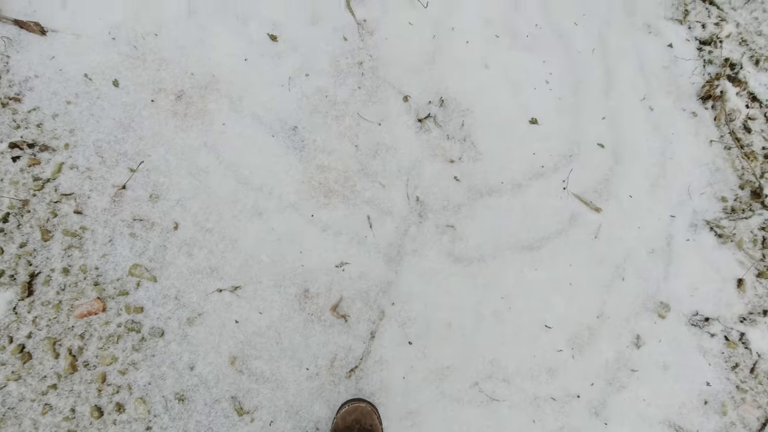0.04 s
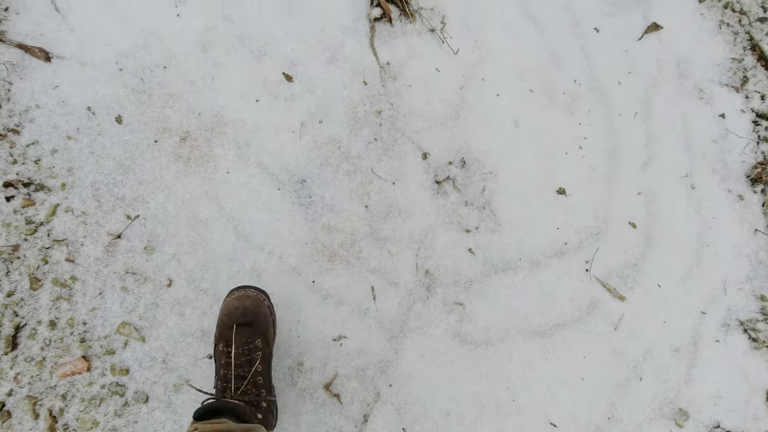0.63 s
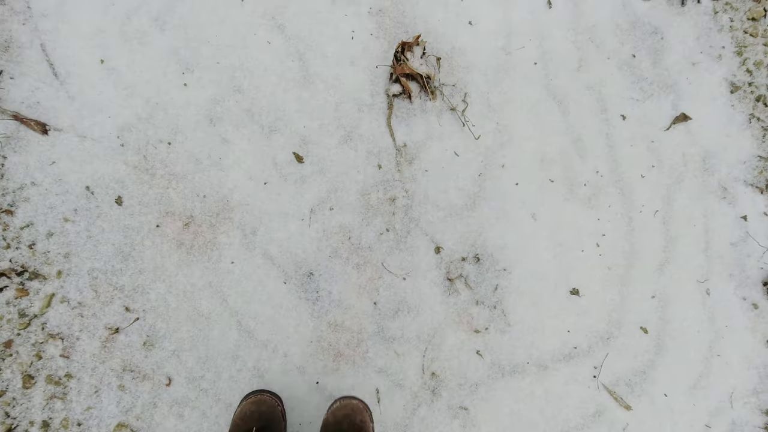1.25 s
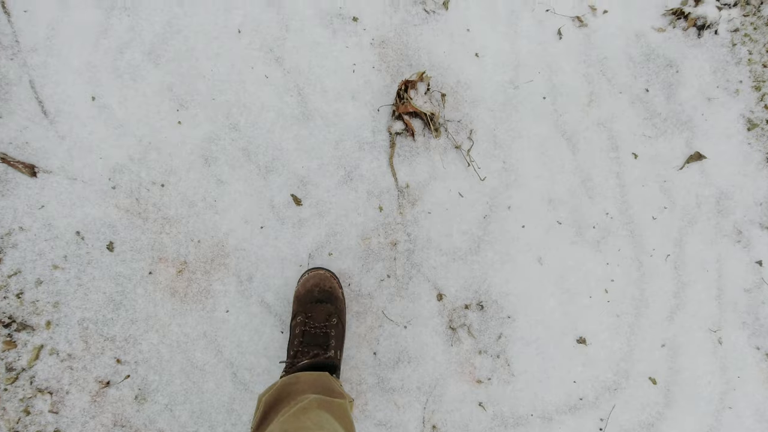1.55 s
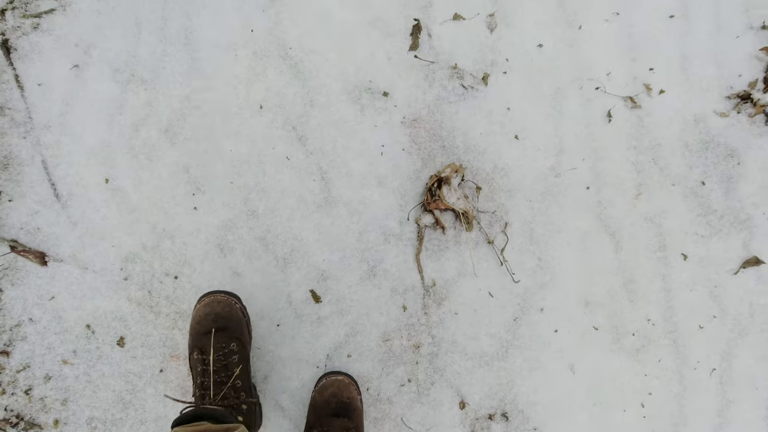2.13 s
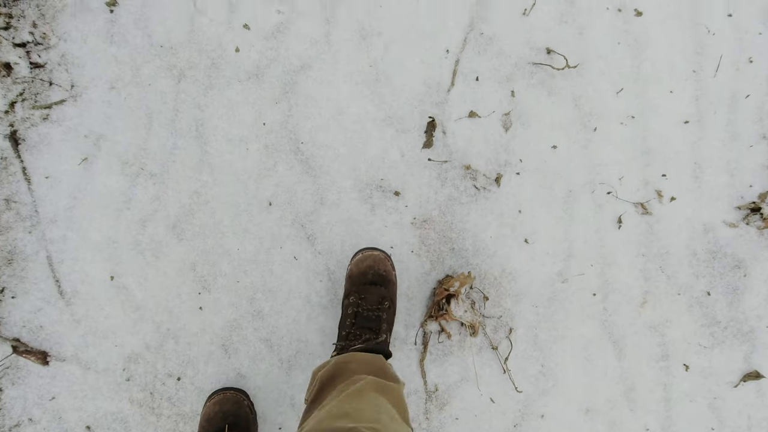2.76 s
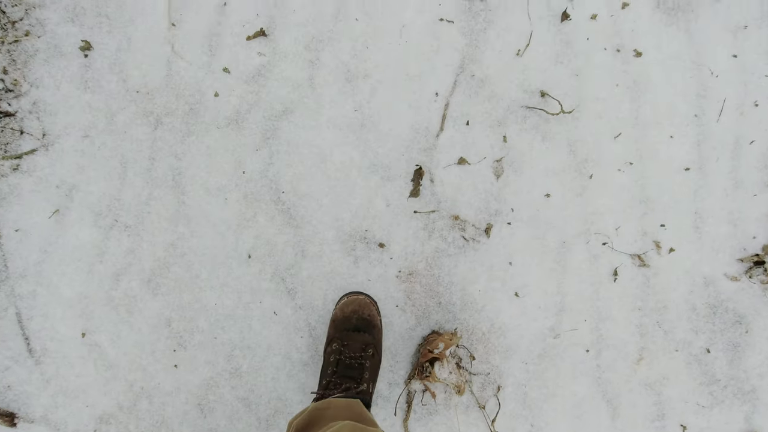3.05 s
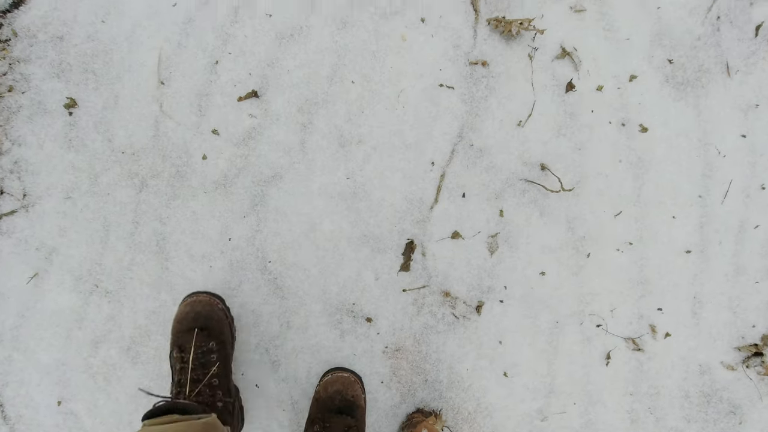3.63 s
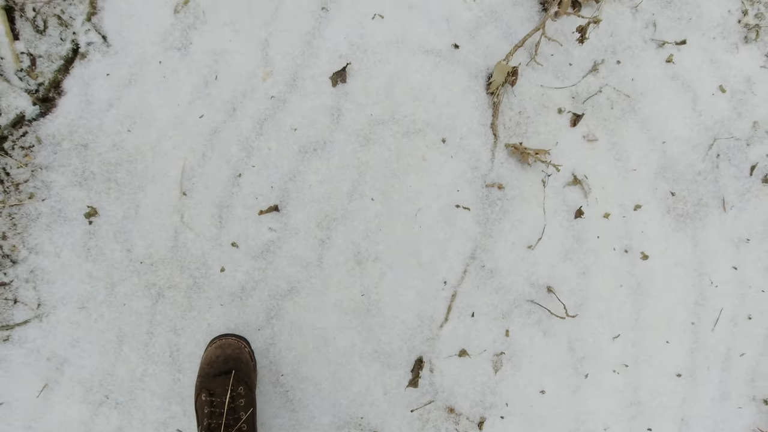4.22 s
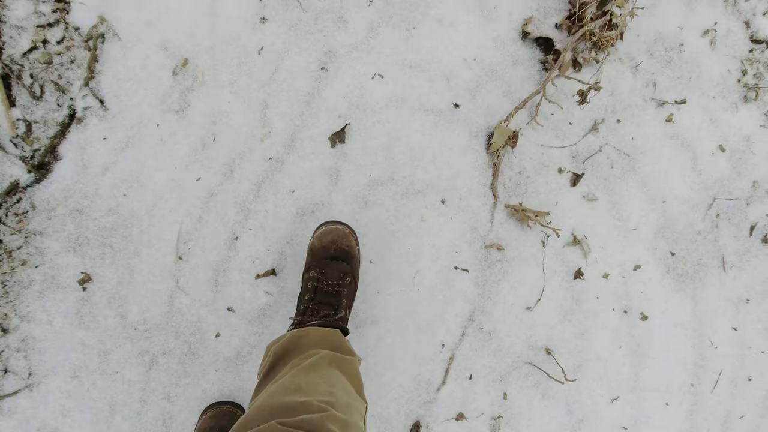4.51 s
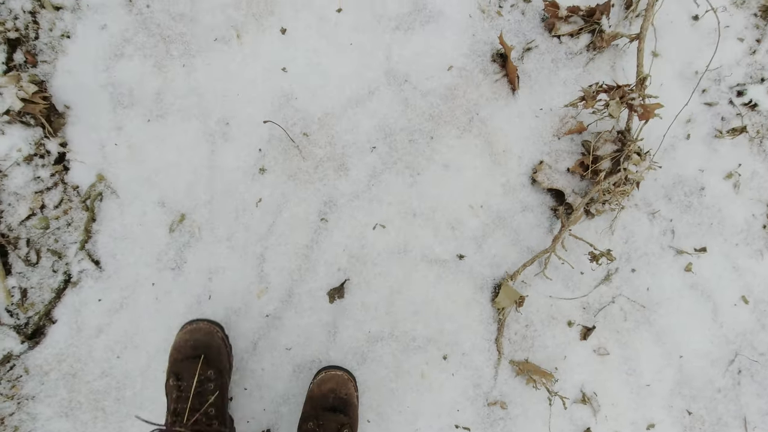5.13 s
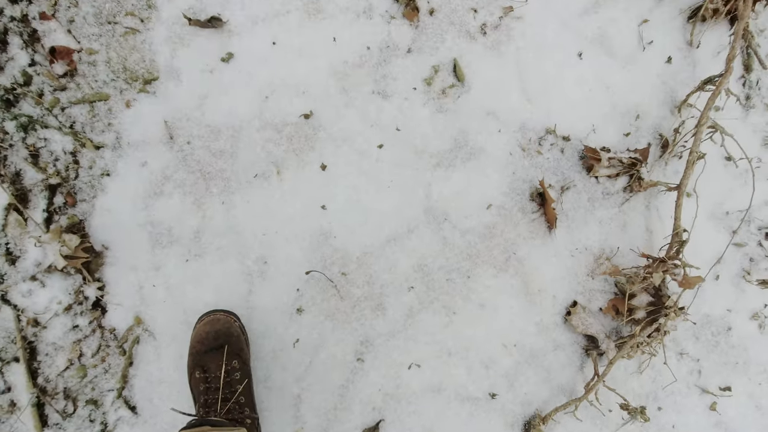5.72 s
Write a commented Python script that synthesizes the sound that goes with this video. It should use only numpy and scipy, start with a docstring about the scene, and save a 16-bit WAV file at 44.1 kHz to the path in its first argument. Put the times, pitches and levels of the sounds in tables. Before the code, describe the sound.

Leather boots walk over a thin crust of frozen snow outdoors, heard close from above. After a few light ticks, each step breaks the crust in a run of sharp cracks over a fine, gritty crackle. One sole scuffs briefly early on. Later steps sound heavier, with short thuds as the crust gives way and dull creaks of packing snow. Faint hiss, low rumble and soft puffs of air on the microphone lie beneath.

```python
"""Boots on frozen snow

Leather boots break a thin crust, heard from above. Each step snaps it in a run of sharp cracks over
a fine crackle of crumbs; a slab that gives way also thuds. Snow creaks dully as it packs, and one
sole scuffs. Faint background hiss, low rumble and slow air on the microphone lie beneath."""
import sys
import numpy as np
from scipy import signal
from scipy.fft import rfft, irfft, next_fast_len
from scipy.io import wavfile
from scipy.ndimage import uniform_filter1d

SR = 44100
rng = np.random.default_rng(int(sys.argv[2]) if len(sys.argv) > 2 else 0)


def persist_wave(psi):
    """Save psi, clipped to +-1, as 16-bit WAV."""
    counts = np.round(np.clip(psi, -1, 1) * 32767).astype(np.int16)
    wavfile.write(sys.argv[1], SR, np.atleast_2d(counts).T)


N = 263277
TIME_S = np.arange(N) / SR


def crack(db, low_hz, ring_hz, ring_db, slope_db_oct, length_ms, size=2048):
    """One fracture: a snap, a dying run of tiny slips, the short ring of the broken plate."""
    t, hz = np.arange(size) / SR, np.fft.rfftfreq(size, 1 / SR) + 1
    slip_gain, jerk_db, settle_db, settle_s, ring_oct = .29, 5, -29, .0077, .28
    burst, settling, catch = rng.standard_normal((3, size))
    jerks = undb(jerk_db * np.clip(np.repeat(catch, 16)[:size], -2, 2))  # the crack catches and jumps
    force = slip_gain * burst * jerks * np.exp(-t * 1000 / max(length_ms * 1.47, .1))
    force[0] += 1
    force += slip_gain * undb(settle_db) * settling * jerks * np.exp(-t / settle_s)
    flatten_db = -10 * np.log10(uniform_filter1d(np.abs(rfft(force)) ** 2, size=91))
    plate_db = ring_db / (1 + (np.log2(hz / ring_hz) / ring_oct) ** 2)
    plate_db += slope_db_oct * np.log2(1 + hz / 2000)
    plate_db -= 10 * np.log10(1 + (low_hz / hz) ** 5)  # small plates cannot radiate long waves
    # microphone colour on every crack, brightest near 8 kHz
    mic_colour_db = colour_db([(5000, -1), (6500, -2.5), (8300, 0), (10000, -8),
                               (12500, -9.5), (16000, -17.5)], hz)
    snap = shape(force, flatten_db + plate_db + mic_colour_db)
    rms_1ms = np.sqrt(np.sum(snap ** 2) / (SR / 1000))
    return undb(db) * snap / rms_1ms


# loud snaps: (time [s], level over 1 ms [dB], low cut [Hz], ring [Hz], slope [dB/oct], length [ms])
SNAPS = [(0.0848, -42, 2970, 7650, 0, .6), (0.1068, -45.5, 3000, 7300, 3, 0.54),
         (0.2123, -51, 2000, 5100, -3, 0.74), (0.5894, -25, 2160, 6200, 3, 0.35),
         (0.655, -42.3, 2500, 6020, 5, .3), (0.6637, -39, 4890, 8000, 6, 0.32),
         (0.7004, -44, 3050, 6040, 9, .4), (0.7585, -38, 920, 5100, 1.5, 2.5),
         (0.8841, -22.5, 940, 5000, -1, 1.1), (0.9763, -36, 2500, 3930, -12, 1.2),
         (0.9983, -30.5, 790, 4180, 3, 0.94), (1.0265, -32, 1713, 1630, -8, 3),
         (1.045, -26.5, 1370, 5350, 1.5, 0.51), (1.0609, -28.5, 1500, 1600, -0.5, 1.1),
         (1.11, -19.5, 1950, 1250, -7, 1.55), (1.1365, -19.5, 1260, 4870, -4.5, .9),
         (1.1562, -31, 1060, 3150, -7, 1.2), (1.1713, -26.5, 1760, 1850, -1, 0.92),
         (1.1773, -32, 1050, 7030, -5, 0.61), (1.1938, -29.5, 1290, 2920, -2, 0.76),
         (1.217, -23.5, 2030, 1380, -3.5, 0.71), (1.3503, -23.5, 800, 3700, -9, 1.7),
         (1.3966, -32.5, 1070, 3100, -4, 1.2), (1.4118, -28.5, 2580, 2680, -12, .7),
         (1.474, -37, 1040, 4570, 2, 1.2), (1.5009, -23, 1100, 1290, -1, 0.66),
         (1.531, -30, 1300, 1460, -2, 0.36), (1.5368, -22.5, 1410, 3770, -7, 0.4),
         (1.5472, -23.5, 1340, 1300, -8.5, 0.62), (1.6336, -34.5, 880, 2020, 4.5, .9),
         (1.6895, -25, 625, 1300, -11.5, 0.38), (1.7968, -44.5, 4460, 1490, -16, 0.7),
         (1.8424, -37, 960, 4630, -13, 1.1), (1.846, -24, 2850, 5000, -9.5, 0.8),
         (1.9349, -26, 2980, 2500, 0, 0.23), (1.9453, -34, 2500, 1120, 2, 0.3),
         (1.9663, -25.5, 4040, 1080, -11, .35), (2.154, -28.5, 1200, 5200, 5.5, .36),
         (2.1962, -25.6, 1170, 4530, -1.5, 0.78), (2.2265, -30.5, 5570, 10200, -8, 0.28),
         (2.24, -25, 1370, 2500, -2.5, 1.4), (2.3029, -25, 3100, 6800, -11.5, 0.45),
         (2.3586, -31.5, 1810, 2580, -0.5, 0.54), (2.5938, -34, 454, 795, -22.5, 0.91),
         (2.6315, -31.5, 670, 5540, -5, 0.95), (2.6817, -43, 665, 4770, 3, 1),
         (3.0849, -30.5, 895, 1360, -11.5, 1.7), (3.0966, -25, 1160, 5340, -8, 0.83),
         (3.1021, -24.5, 1250, 1320, -3, 0.5), (3.1103, -35.5, 1280, 5980, -9, .6),
         (3.1236, -36.5, 1390, 1760, -3, .6), (3.1597, -34.5, 1580, 1770, -2, .5),
         (3.1865, -32.5, 1930, 1960, -3, 3.3), (3.2703, -32, 1400, 3660, -9.5, 1),
         (3.371, -41.5, 600, 4560, -.5, 1.1), (3.4018, -44, 970, 4040, 2, 0.32),
         (3.4956, -23, 1620, 3600, -5, 0.84), (3.5852, -38, 700, 3500, 2.5, .8),
         (3.6623, -21, 460, 4050, -2.5, 0.43), (3.6686, -36, 370, 600, -5, 1.1),
         (3.6791, -29, 370, 560, 2, 0.62), (3.694, -36.5, 366, 590, -5, 1.7),
         (3.8917, -37, 3160, 3260, 4.5, 0.83), (3.982, -40, 720, 1640, -22, 0.19),
         (4.158, -32.5, 3500, 6300, 10, .8), (4.1613, -26, 900, 6200, 3, 0.36),
         (4.172, -22.5, 900, 1330, -3.5, 2.7), (4.2065, -23, 450, 5640, -3, 3.1),
         (4.2261, -27.5, 370, 1710, -5, 2.1), (4.309, -28.5, 1460, 4950, -8, 1.9),
         (4.3215, -32, 910, 6200, 5, .76), (4.348, -27, 372, 9900, -5.5, 2.8),
         (4.3938, -36, 370, 8880, 4, 1.1), (4.4161, -29, 5250, 3730, -11, 1.9),
         (4.4721, -35.5, 370, 600, 5, 0.63), (4.5687, -22.5, 445, 9100, -11, 1.33),
         (4.7347, -20.5, 450, 1280, -2.5, 1.07), (4.8189, -29.5, 370, 8540, 0, 0.45),
         (4.836, -15, 1260, 1420, -7, 0.95), (4.8722, -36, 990, 11300, -4, 1.3),
         (4.9176, -23.5, 372, 9100, -3, 1.7), (4.9783, -20.5, 370, 610, 3.5, 1.6),
         (4.9848, -33, 373, 614, -1, 0.82), (5.0154, -36, 370, 3900, 2, 1.5),
         (5.0536, -37, 370, 10900, 3, 0.54), (5.1322, -32.5, 370, 7700, -2, 0.85),
         (5.1884, -28, 1380, 1840, -5.5, 0.64), (5.2976, -46, 4500, 3780, -16, 1.8),
         (5.381, -30, 356, 706, 4, 2), (5.4484, -23, 690, 4430, -4.5, 2.4), (5.5128, -22, 630, 3960, 0, 3),
         (5.5258, -25, 700, 3450, -0.5, 4.5), (5.5366, -32.5, 600, 3540, 2, 7.2),
         (5.5472, -25.5, 455, 1510, -1.5, 1.5), (5.5743, -29.5, 370, 3240, 6, 0.69),
         (5.6151, -25, 810, 11100, -1, 7.1), (5.6209, -26.5, 375, 5880, -5, 0.66),
         (5.6878, -23, 533, 11500, -8.5, 0.5), (5.7022, -20.5, 293, 2300, -4, 1.75),
         (5.7486, -36.5, 524, 1042, -29, 0.82), (5.781, -18.5, 373, 790, -2.5, 2),
         (5.8098, -30.5, 550, 3640, 1.5, 5.5)]
PLATE_RING_DB = 9


def crust(ring_loss_db_per_doubling=1.5):
    """The crust snaps under each step; longer fractures ring less."""
    out = np.zeros(N)
    for s, db, low_hz, ring_hz, slope_db_oct, length_ms in SNAPS:
        ring_db = PLATE_RING_DB - ring_loss_db_per_doubling * np.log2(length_ms)
        add(out, s, crack(db, low_hz, ring_hz, ring_db, slope_db_oct, length_ms))
    return out


def splinters(load, count=165, base_db=-43, ref_load_db=-58, spread_db=4, scatter_oct=.76):
    """Small random snaps, denser and louder under load; the low cut follows the loud snaps."""
    work = np.cumsum(load ** .55)
    times_s = np.interp((np.arange(count) + rng.random(count)) / count, work / work[-1], TIME_S)
    snap_s, _, snap_low_hz = np.transpose(SNAPS)[:3]
    out = np.zeros(N)
    for s, (strength, pitch, tilt) in zip(times_s, np.clip(rng.standard_normal((count, 3)), -2, 2)):
        load_db = 20 * np.log10(np.interp(s, TIME_S, load)) - ref_load_db
        db = base_db + .67 * load_db + spread_db * strength
        low_hz = np.interp(s, snap_s, snap_low_hz)
        ring_hz = 5500 * 2 ** (scatter_oct * pitch)
        add(out, s, crack(db, low_hz, ring_hz, PLATE_RING_DB, slope_db_oct=3 * tilt - 1, length_ms=.55))
    return out


# slabs giving way: (time [s], level [dB], pitch [Hz], swell [ms], relative ring [dB])
SLAB_DROPS = [(1.621, -47, 230, 2.5, -14), (1.663, -35.5, 220, 3.4, -26), (1.6888, -28, 624, 0.22, -36),
              (2.3221, -38.5, 232, 1.5, -8), (2.8686, -19.5, 295, 1.26, -21),
              (3.4956, -32.5, 520, 0.64, -34), (3.6624, -42.5, 464, 0.3, -2.5),
              (3.6784, -34, 466, 0.61, -17), (4.1735, -45.5, 377, 1.2, 7), (4.21, -32, 400, 0.64, -28),
              (4.347, -39, 420, 1.4, -5.5), (4.5686, -27, 506, 1.22, -19), (4.6395, -36.5, 204, 1.8, -16),
              (4.661, -38.5, 303, 2.3, -12), (4.734, -26.5, 480, 2, -5.5), (4.8348, -23.5, 283, 1.1, 2),
              (4.9178, -22, 337, 0.96, -35), (4.9783, -20.5, 374, 0.83, -42), (5.6998, -26, 422, 0.82, -31),
              (5.781, -23, 465, 0.53, -7.5)]
# modes of the crust on the ground: (frequency [Hz], t60 [ms], gain [dB])
SLAB_MODES = [(183, 50, 0), (282, 33, -5.5), (378, 61, -6)]


def thuds(low_hz=135, size=4096):
    """A slab drops: a brief swing, then a low ring. It is too small to radiate deep bass."""
    out, t = np.zeros(N), np.arange(size) / SR
    for s, db, hz, swell_ms, ring_db in SLAB_DROPS:
        age = t * 1000 / swell_ms
        drop = age * np.exp(1 - age) * np.sin(2 * np.pi * hz * t)
        detunes = 1 + .04 * rng.standard_normal(len(SLAB_MODES))
        ring = sum(undb(mode_db - 60 * t * 1000 / t60_ms) * np.sin(2 * np.pi * mode_hz * detune * t)
                   for (mode_hz, t60_ms, mode_db), detune in zip(SLAB_MODES, detunes))
        add(out, s, undb(db) * (drop + undb(ring_db) * ring))
    return signal.sosfilt(signal.butter(4, low_hz, "high", fs=SR, output="sos"), out)


# a boot landing or rolling off: (time [s], hold [s], load [dB])
SOLE_PRESSES = [(0.104, .16, -72), (0.649, .1, -72.5), (.8, .04, -62.5), (.99, .09, -58), (1.11, .1, -50.5),
                (1.249, .39, -58), (1.722, .09, -67), (1.862, .15, -55), (2.196, .16, -67.5),
                (2.632, .06, -62), (3.128, .17, -68), (3.471, .03, -67), (3.669, .03, -62),
                (3.879, .015, -64.5), (4.168, .07, -53), (4.291, .32, -60), (4.681, .08, -57),
                (4.881, .13, -55), (5.188, .11, -71.5), (5.39, .09, -66.5), (5.534, .14, -57.5),
                (5.699, .11, -53), (5.85, .06, -65)]


def sole_load(attack_s=.012, release_s=.027):
    """How hard the soles grind the crust, as a gain over time."""
    return np.max([swell(*press, attack_s, release_s) for press in SOLE_PRESSES], axis=0)


# crumb spectrum: (frequency [Hz], gain [dB])
CRUMB_EQ = [(200, -16), (600, -7), (1500, 3.5), (3600, 0), (6300, -1), (8300, -4), (10000, -9.5),
            (13000, -5.5), (16000, -22.5)]


def crumbs(load, gain_db=-1, grit_s=.00057, powder_db=-9):
    """Ice crumbs break under the sole, each with a gritty tail, over a soft rustle of powder."""
    tail = np.exp(-2 * np.arange(128) / SR / grit_s)
    power = signal.lfilter(tail, 1, grains(rate_hz=650, spread_db=4.5) ** 2)
    grit = unit(np.sqrt(power)) + undb(powder_db)
    return undb(gain_db) * load * tint(grit * rng.standard_normal(N), CRUMB_EQ)


# scuff spectrum: (frequency [Hz], gain [dB])
SCUFF_EQ = [(180, -73), (300, -72), (523, -17), (1190, -3), (2360, -4.5), (2780, -12.5), (3550, 6),
            (4540, -14), (5180, -6), (6300, -24), (7790, -9), (10100, -39), (15000, -39)]


def scuff():
    """One sole slides over ice in dense, bright stick-slip."""
    slide = swell(s=1.323, hold_s=.011, db=-28, attack_s=.0054, release_s=.011)
    return tint(grains(rate_hz=15000, spread_db=5), SCUFF_EQ) * slide


# weight sinking into the snow: (time [s], level [dB], release [s])
SNOW_SINKS = [(1.665, -49, 0.029), (2.61, -62, 0.023), (2.885, -49, 0.037), (2.98, -57.5, 0.075),
              (3.1, -54, 0.073), (4.19, -50, 0.15), (4.66, -51.5, 0.063), (4.85, -46.5, 0.099),
              (4.99, -44.5, 0.024), (5.46, -55.5, 0.16), (5.795, -48.5, .035)]
# creak spectrum: (frequency [Hz], gain [dB])
PACKING_EQ = [(70, -15), (120, -13.5), (175, -1.5), (400, -2), (700, -8), (1400, -11), (3000, -17.5),
              (8000, -36)]


def packing(attack_s=.02):
    """Snow below the crust sticks and slips as it packs: a dull creak."""
    sink = np.max([swell(s, 0, db, attack_s, release_s) for s, db, release_s in SNOW_SINKS], axis=0)
    return tint(grains(rate_hz=750, spread_db=3.5), PACKING_EQ) * sink


def outdoors(x, near_db=-19, near_s=.01, far_db=-27, far_s=.048, size=16384):
    """Legs and ground scatter the sound at once; the surroundings return a faint tail."""
    t = np.arange(size) / SR
    near, far = rng.standard_normal((2, size)) * np.exp(-t / np.array([[near_s], [far_s]])) * (t > .0015)
    echo = (undb(near_db) * unit(near) + undb(far_db) * unit(far)) / np.sqrt(size)
    echo = signal.sosfilt(signal.butter(1, 8000, fs=SR, output="sos"), echo)
    return x + signal.fftconvolve(x, echo)[:N]


# background hiss envelope: (time [s], relative level [dB])
HISS_LEVELS = [(0, -56.5), (1.05, -57.5), (2.06, -61.5), (3.94, -63), (4.8, -59.5), (5.15, -65),
               (5.45, -63), (5.75, -56), (5.97, -66)]
# hiss spectrum: (frequency [Hz], gain [dB])
HISS_EQ = [(25, 15), (60, 4), (90, 3), (150, 1), (250, -2.5), (450, -7.5), (900, 0.5), (1500, -3.5),
           (2500, -13), (4000, -22.5), (8000, -26), (12000, -40), (16000, -45)]
# rumble envelope: (time [s], level [dB])
RUMBLE_LEVELS = [(0, -61), (.7, -63), (1.1, -81), (2.5, -82), (5.97, -78)]


def background(hiss_gain_db=3):
    """Hiss that fades early and swells under the last two steps; a low rumble that falls away."""
    hiss = undb(hiss_gain_db) * curve(HISS_LEVELS) * tint(rng.standard_normal(N), HISS_EQ)
    rumble_eq = [(30, -18.5), (60, 6.5), (90, 8.5), (150, 2), (220, -30), (600, -48.5), (3000, -76)]
    return hiss + curve(RUMBLE_LEVELS) * tint(rng.standard_normal(N), rumble_eq)


# pushes of air: (time [s], peak [dB], width [ms])
AIR_PUFFS = [(1.39, -39.5, 23), (2.169, -37, 13.7), (2.657, -35.5, 20), (2.759, -40.5, 18),
             (2.891, -42, 36), (3.38, -42, 34), (4.63, -43, 29), (4.93, -46, 69), (5.723, -38.5, 21)]


def mic_air(sway_db=-73):
    """Slow pressure swings on the microphone as the walker sways."""
    sway_eq = [(5, -11), (15, -7), (35, -8.5), (70, -9), (200, -63), (1000, -89)]
    out = undb(sway_db) * tint(rng.standard_normal(N), sway_eq)
    for s, db, width_ms in AIR_PUFFS:
        offset = (TIME_S - s) * 1000 / width_ms
        out -= undb(db) * (1 - offset ** 2) * np.exp(-offset ** 2 / 2)
    return out


def grains(rate_hz, spread_db):
    """Random clicks, many small and a few large."""
    sizes = undb(spread_db * np.minimum(rng.exponential(size=N), 3))
    return (rng.random(N) < rate_hz / SR) * sizes * rng.choice([-1, 1], N)


def swell(s, hold_s, db, attack_s, release_s):
    """Gain that rises until time s, holds and decays."""
    early_s, late_s = np.maximum(s - TIME_S, 0), np.maximum(TIME_S - s - hold_s, 0)
    return undb(db) * np.exp(-np.minimum(early_s / attack_s + late_s / release_s, 30))


def undb(db):
    """Decibels to gain."""
    return 10 ** (np.asarray(db) / 20)


def unit(x):
    """Scale to rms 1."""
    return x / np.sqrt(np.mean(x ** 2))


def curve(rows):
    """Gain over time from (time [s], level [dB])."""
    return undb(np.interp(TIME_S, *np.transpose(rows)))


def colour_db(eq, hz):
    """Interpolate (frequency [Hz], gain [dB]) on a log axis."""
    points_hz, db = np.transpose(eq)
    return np.interp(np.log(hz + 1), np.log(points_hz), db)


def shape(x, db):
    """Minimum-phase filter, one gain per bin."""
    cepstrum = irfft(np.log(undb(db)), len(x))
    cepstrum[1:len(x) // 2] *= 2
    cepstrum[len(x) // 2 + 1:] = 0
    return irfft(rfft(x) * np.exp(rfft(cepstrum)), len(x))


def tint(x, eq):
    """Equalise a full track, at rms 1."""
    size = 2 * next_fast_len(N // 2 + 1)
    db = colour_db(eq, np.fft.rfftfreq(size, 1 / SR))
    return unit(shape(np.pad(x, (0, size - N)), db)[:N])


def add(track, s, sound):
    """Mix a sound in at time s."""
    i = int(s * SR)
    track[i:i + len(sound)] += sound[:N - i]


def scene():
    """Steps in the open air, mono."""
    load = sole_load()
    steps = crust() + splinters(load) + thuds() + crumbs(load) + scuff() + packing()
    return (outdoors(steps) + background() + mic_air())[None]


def record(dry, ceiling=.45, top_hz=16200):
    """Soft-clip the sharpest peaks, then low-pass."""
    rounded = ceiling * np.tanh(dry / ceiling)
    return signal.sosfilt(signal.ellip(8, .2, 70, top_hz, fs=SR, output="sos"), rounded)


dry = scene()
out = record(dry)
persist_wave(out)
```